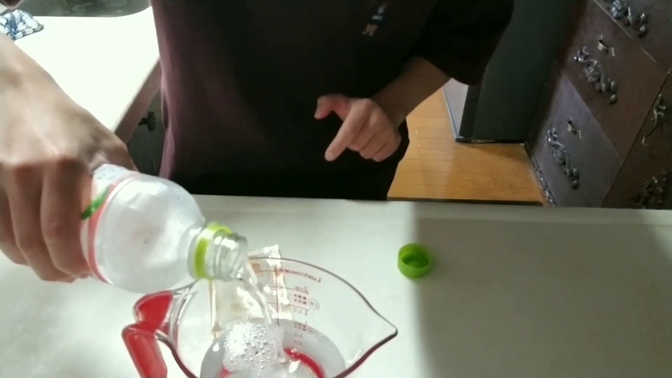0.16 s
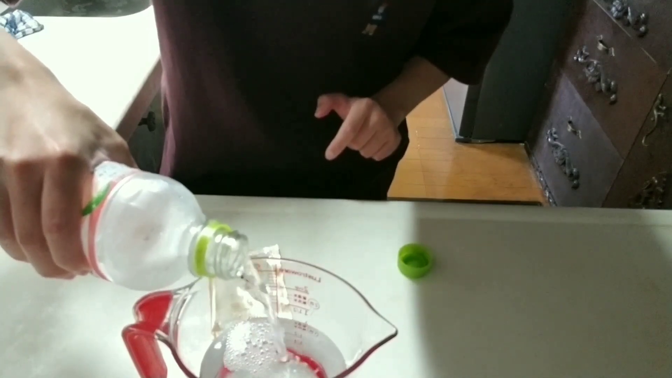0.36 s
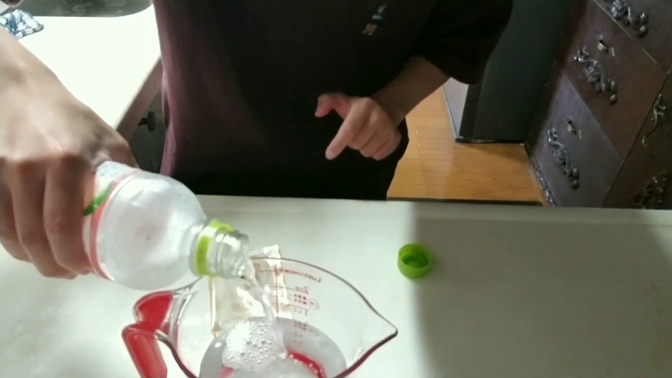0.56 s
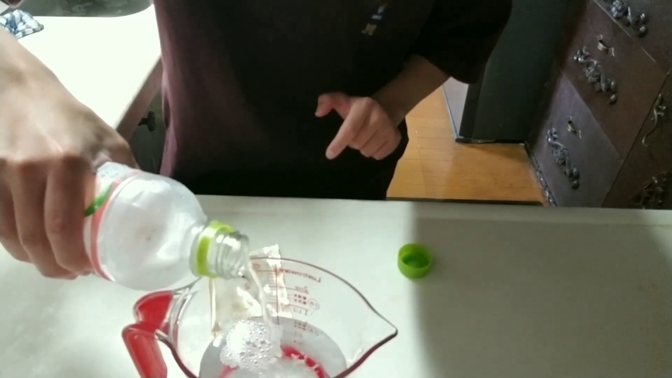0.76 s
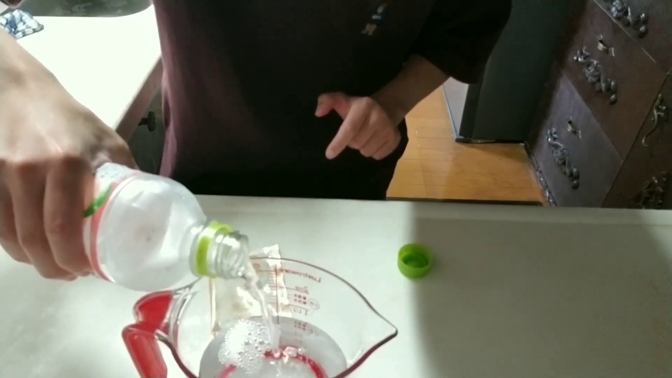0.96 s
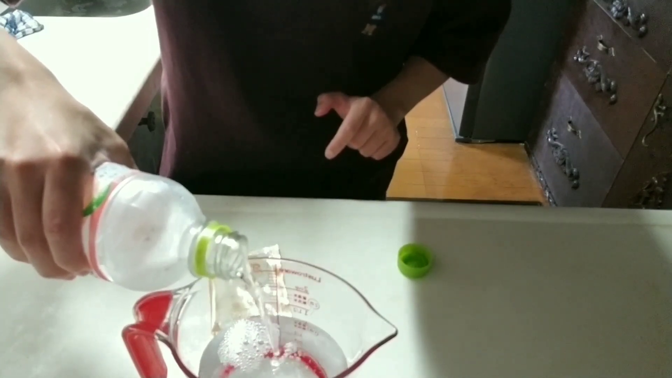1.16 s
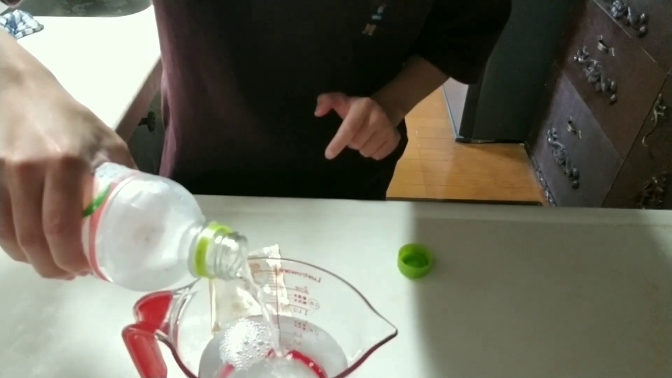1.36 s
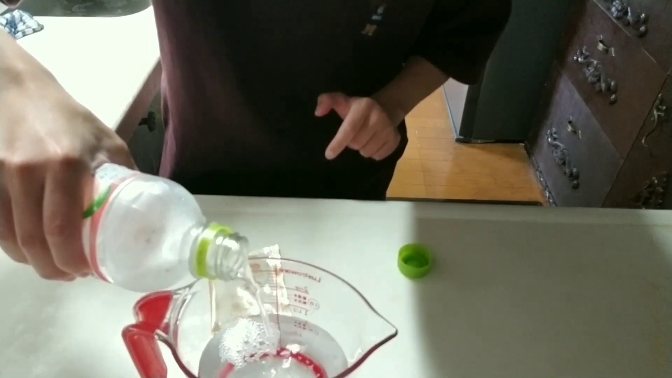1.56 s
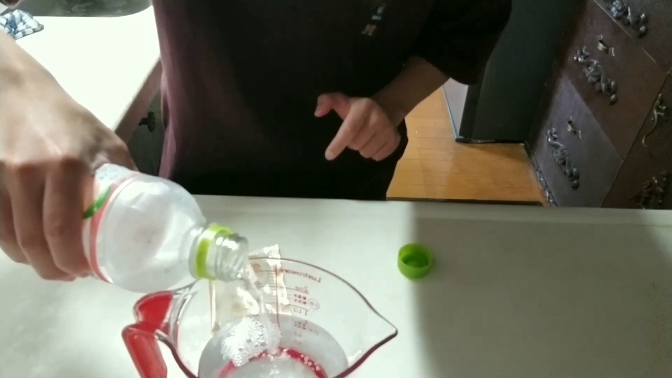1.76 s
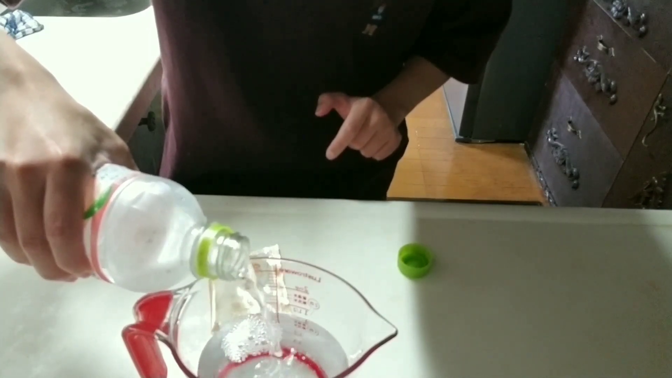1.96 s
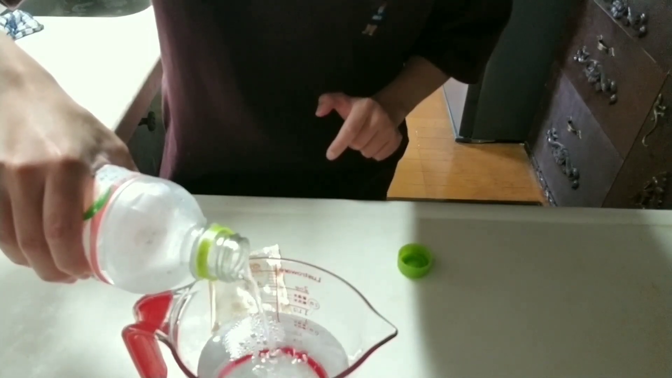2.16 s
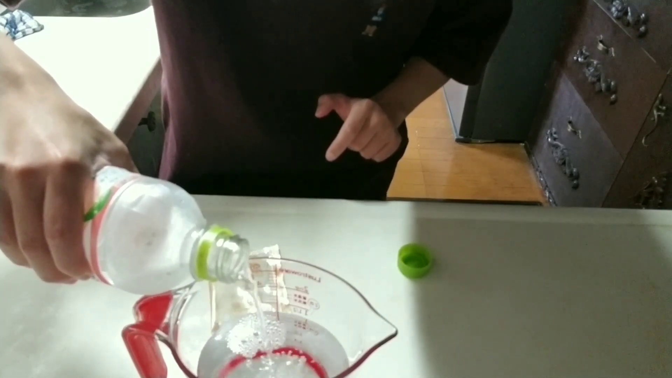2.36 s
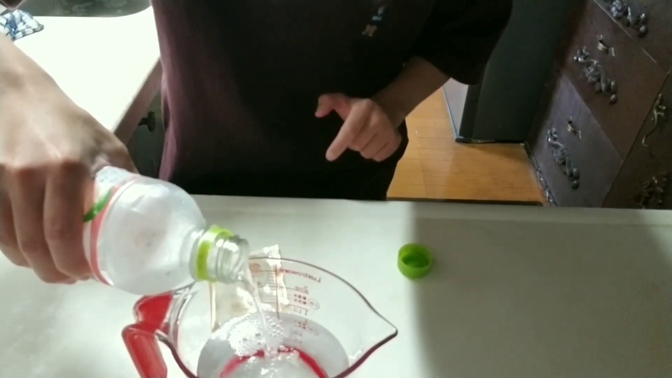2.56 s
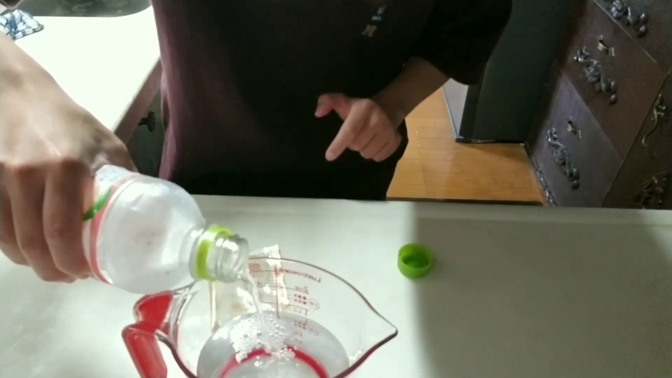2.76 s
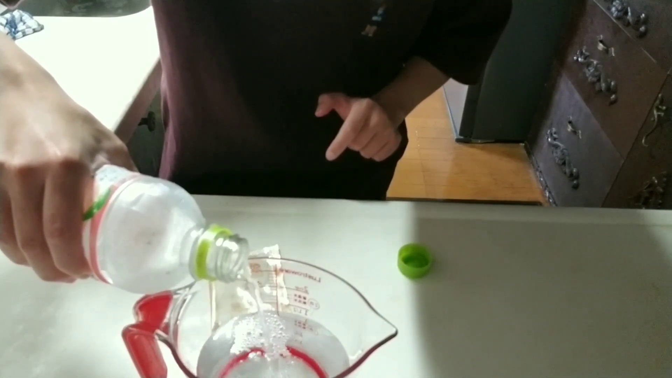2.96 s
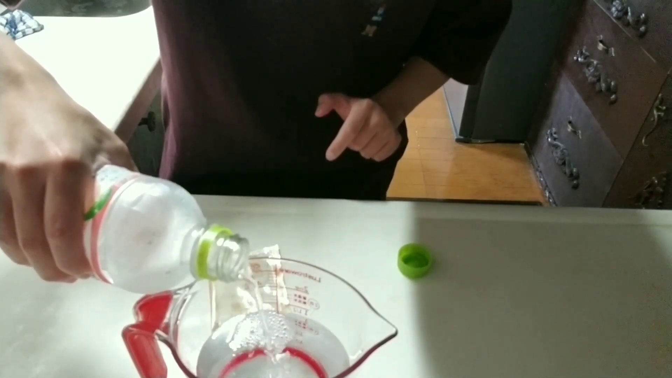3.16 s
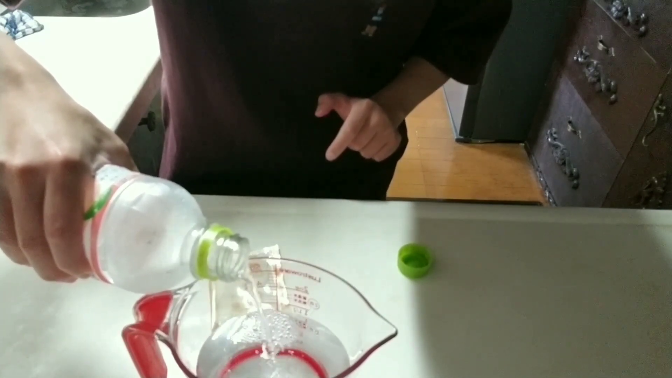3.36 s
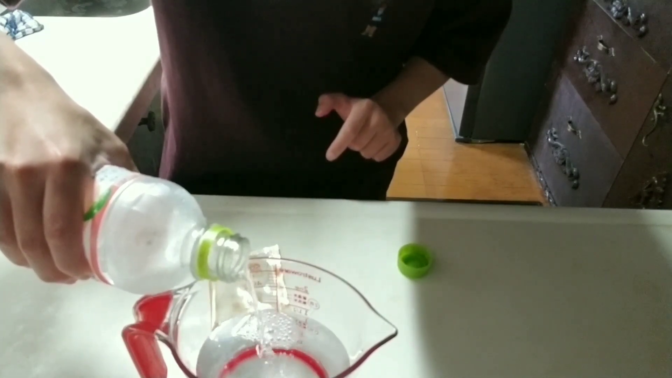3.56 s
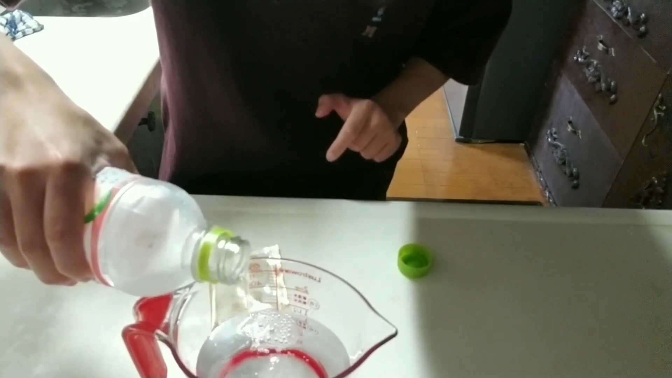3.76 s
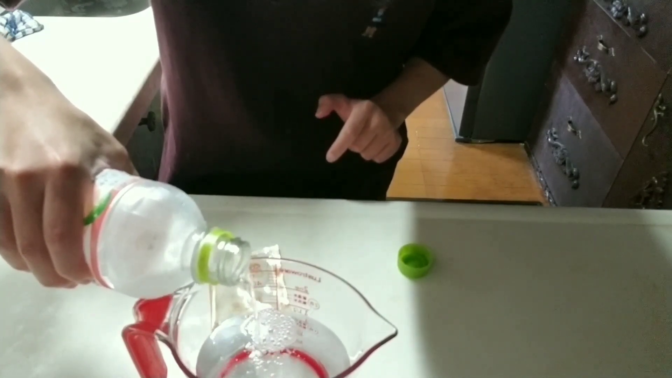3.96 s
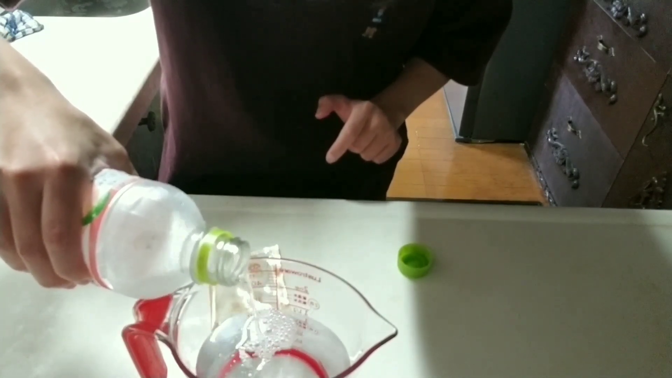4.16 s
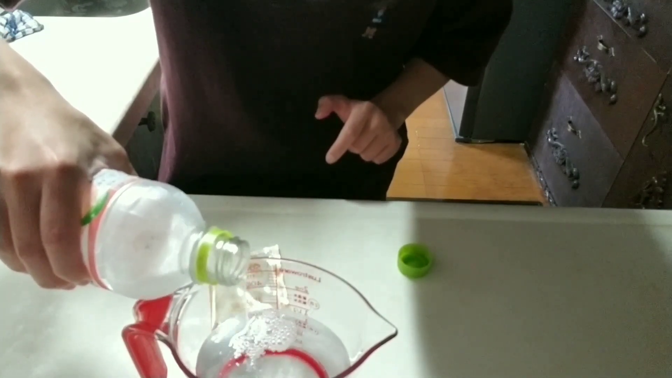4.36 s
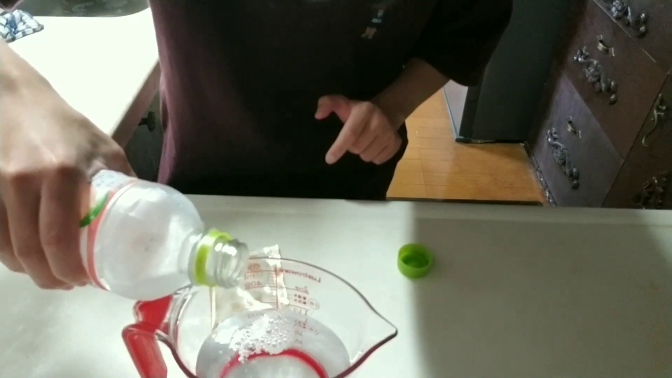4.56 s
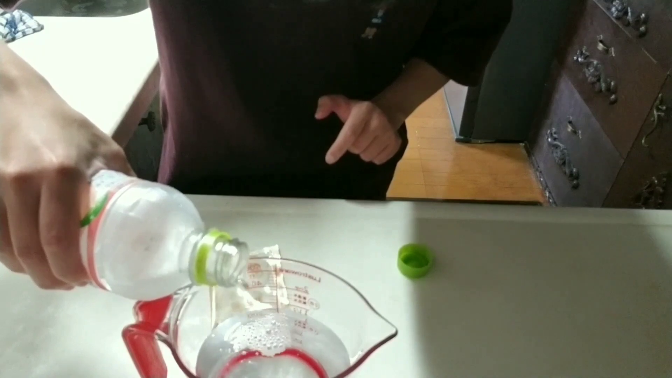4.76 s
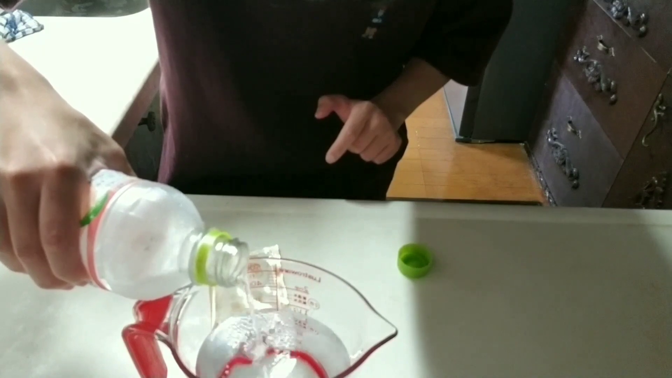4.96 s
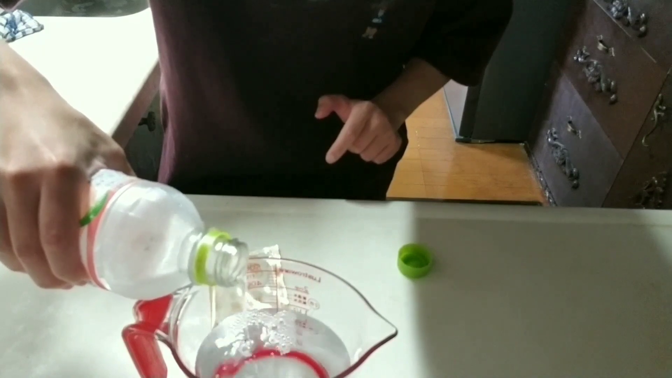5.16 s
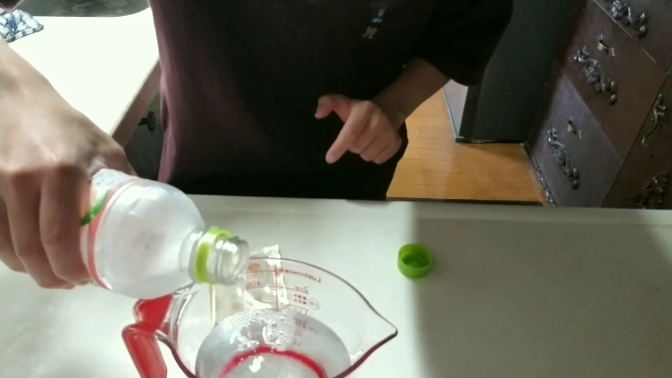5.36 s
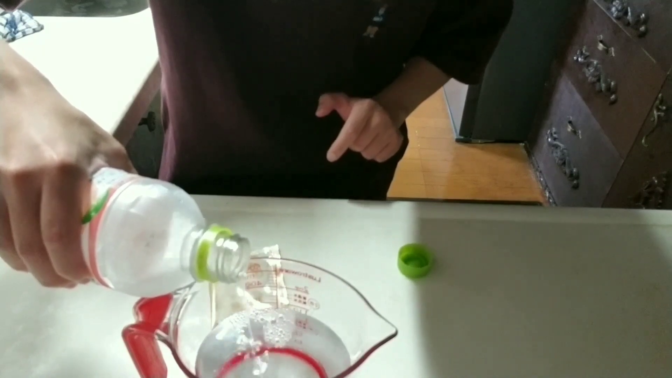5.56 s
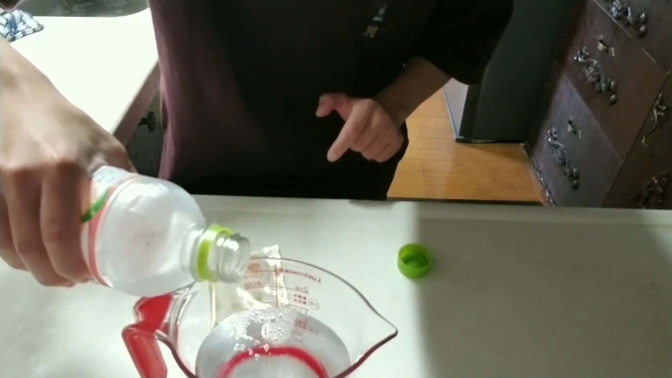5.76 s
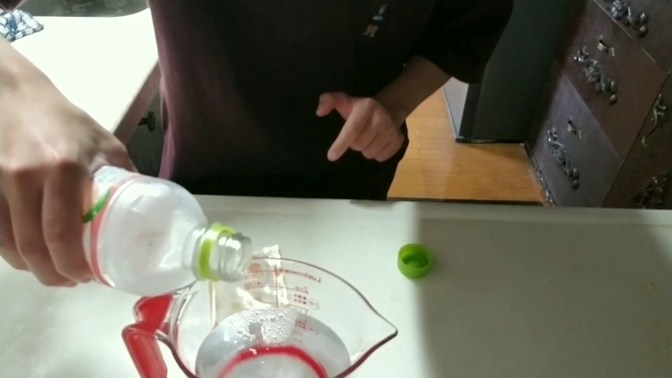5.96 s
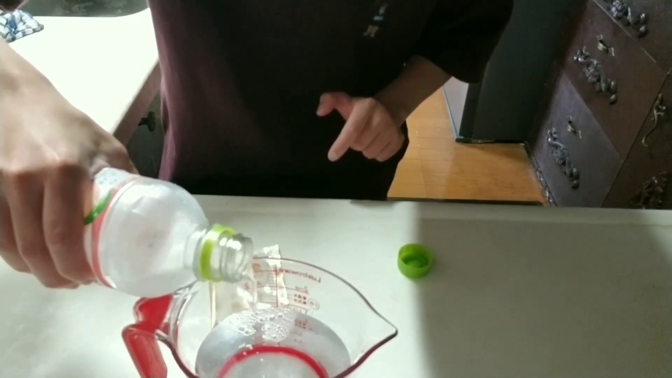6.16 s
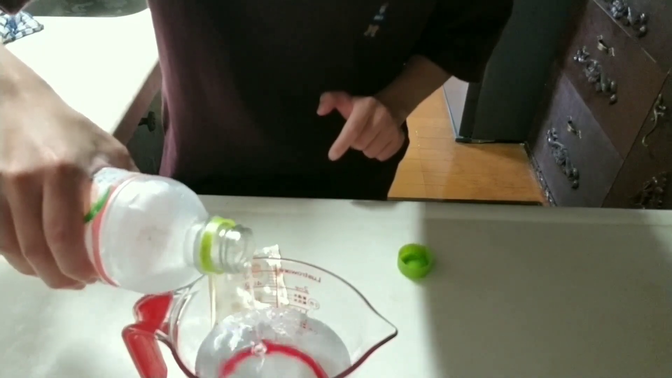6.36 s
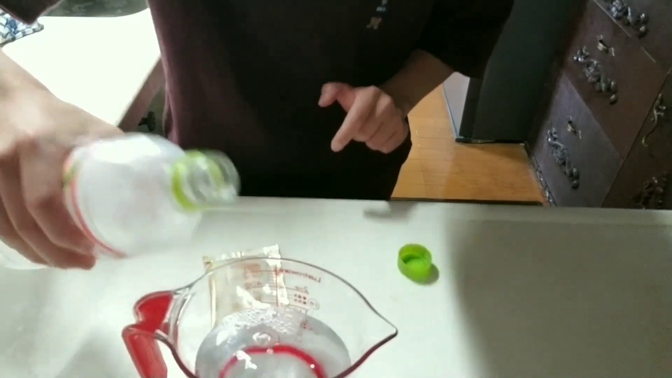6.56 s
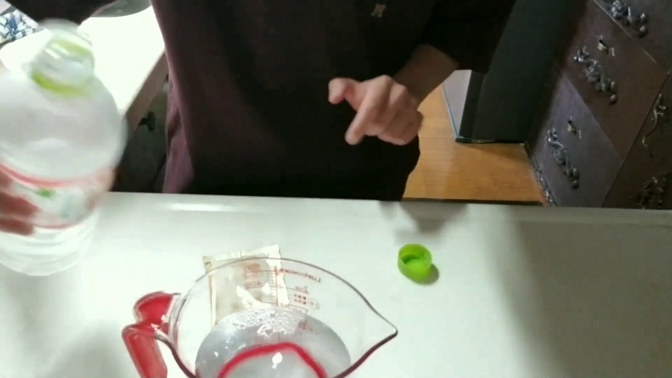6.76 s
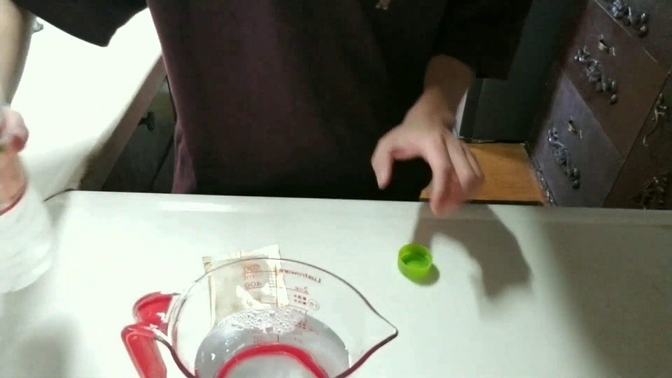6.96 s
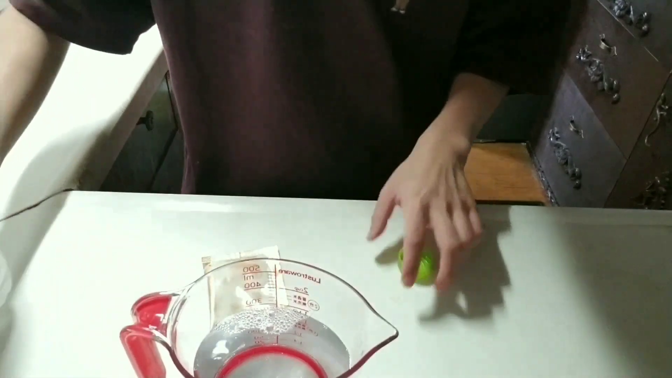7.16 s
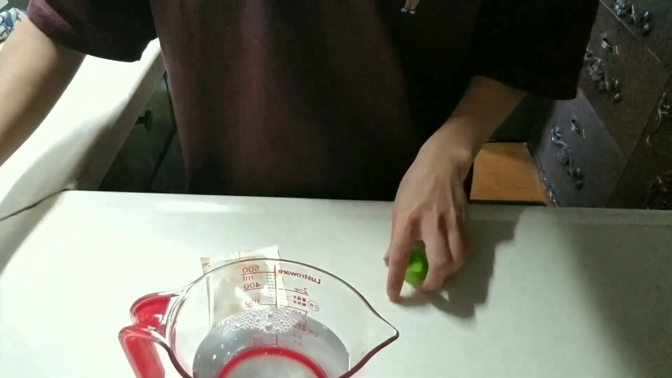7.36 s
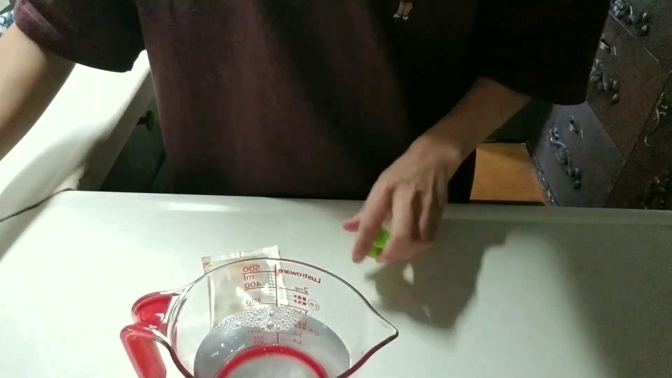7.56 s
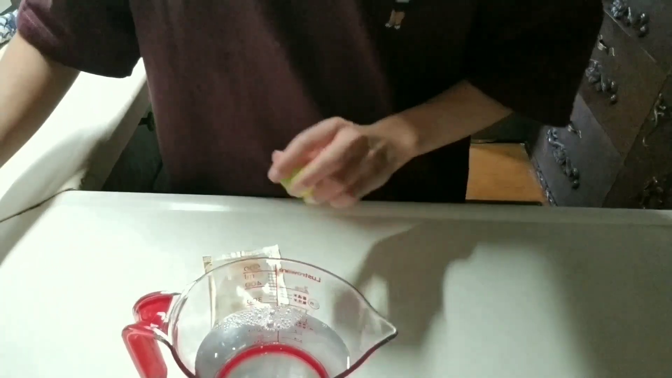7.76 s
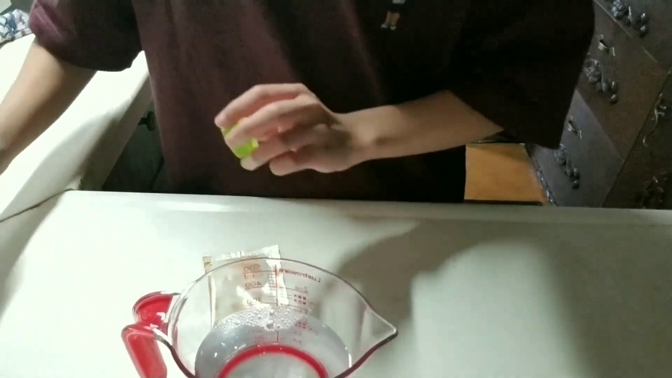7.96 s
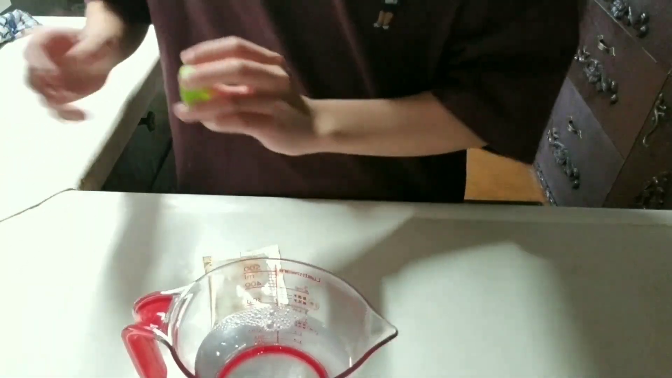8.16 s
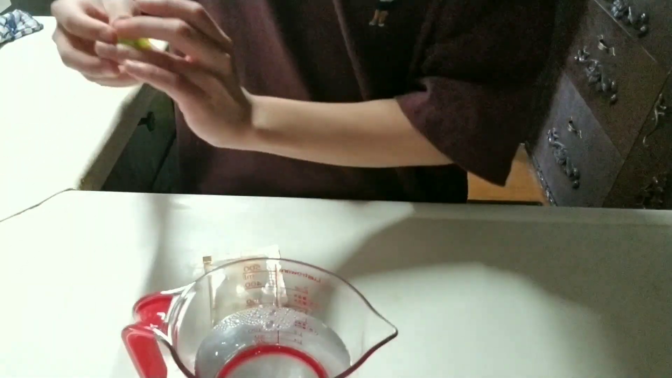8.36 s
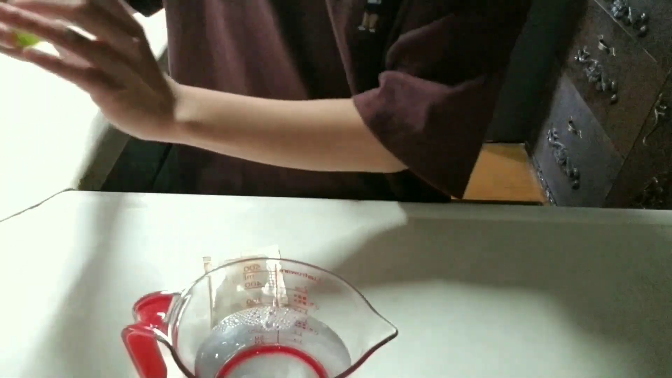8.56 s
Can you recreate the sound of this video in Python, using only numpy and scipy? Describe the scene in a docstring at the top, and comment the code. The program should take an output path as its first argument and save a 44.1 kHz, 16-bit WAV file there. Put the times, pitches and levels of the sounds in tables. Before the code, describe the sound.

Close stereo sound of gentle pouring: small bright bubbles ring with slightly rising pitch among crackling foam and quiet hiss, a little left of centre. Behind it lies steady low room rumble with a wavering thin whine. After nearly seven seconds the trickle ends, thin plastic snaps sharply, the bottle clatters on the counter with dull thuds beneath, and a small plastic cap is picked up with crisp, gritty ticks and scratches.

```python
"""A thin stream of water trickles into a jug: trapped bubbles ring as climbing sines, foam pops and fizzes as noise.
The plastic bottle's thin wall snaps in noise bursts as the grip changes; knocks ring in decaying modes and scuff.
Its cap clicks and drags over the kitchen counter as grainy noise. An appliance hums and whines in wavering tones.
Reflections of noise make the room, and a limiter ducks everything after the loud hits."""
import sys
import numpy as np
from scipy import signal
from scipy.fft import rfft, irfft, next_fast_len
from scipy.io import wavfile

SR = 44100
rng = np.random.default_rng(int(sys.argv[2]) if len(sys.argv) > 2 else 0)


def generate_wav(signal):
    """Clip the signal to [-1, 1] and save it as 16-bit WAV at the path in sys.argv[1]."""
    frames = np.transpose(np.atleast_2d(signal))
    scaled = np.clip(frames, -1, 1) * 32767
    pcm = np.round(scaled).astype(np.int16)
    wavfile.write(sys.argv[1], SR, pcm)


def elevation(decibels):
    """Turn decibel levels (scalar or array-like) into linear amplitude ratios."""
    levels = np.asarray(decibels, float)
    return 10 ** (levels / 20)


N = 380141

# steady room noise: pitch_hz, density_db (relative, per Hz)
ROOM_NOISE = [(15, -11), (25, -8), (114, 1), (166, -9), (256, -4.5), (373, -18), (659, -18), (714, -20.5),
              (1130, -29), (1370, -19.5), (1610, -30), (3000, -32.5), (6740, -31), (8360, -35),
              (12500, -31.5), (16000, -33.5)]
# how alike left and right noise are: pitch_hz, likeness (0 to 1)
LIKENESS = [(60, 0.94), (300, 0.77), (640, 0.31), (1100, 0.053), (3000, 0.011), (15000, .01)]
# appliance tones: pitch_hz, left_db (rms), right_db (rms), left_lead_rad, waver_db
TONES = [(108.2, -49.5, -47, 0.27, -0.5), (213.8, -55.5, -57.5, -1.05, 6.5), (727, -60, -74, -1, 1.5),
         (1334, -57, -92, 0.5, 3.5), (1384, -47, -51.5, 2.5, 1.5)]
# modes of the plastic bottle: pitch_hz, level_db (relative), t60_s
BOTTLE = [(222.6, -14, 0.22), (272, -11.5, 0.043), (304, 5, 0.066), (324, -27, 0.063), (590, -8.5, 0.048),
          (680, -9.5, 0.047), (1020, -14, 0.018), (1403, -9, 0.065), (1636, -1, 0.047), (1965, 2, 0.037),
          (2165, 8.5, 0.037), (2390, -3, 0.058)]
# modes of the counter: pitch_hz, level_db (relative), t60_s
COUNTER = [(48.7, -6, 0.15), (72.2, 2.5, 0.17), (108.5, 1, 0.22), (127, -19, 0.14)]
# knocks; the grip stiffens or slackens the bottle wall: start_s, bottle_db, counter_db, contact_s, pitch_ratio
KNOCKS = [(4.224, -22, -58, 0.004, 0.74), (7.1176, -13.5, -55, 0.00027, 0.99),
          (7.1208, -14, -54, 0.00056, 1.004), (7.152, -24, -51, 0.00054, 1.12),
          (7.2369, -9, -10.5, 0.00073, 1.09), (7.246, 6.5, -47, 0.0025, 0.99),
          (7.256, 1, -43, 0.0024, 0.99), (7.279, -8, -27, 0.0021, 1.055), (7.305, -8, -43, 0.0024, 0.945),
          (7.3438, -21, -14.5, 0.0009, 1.14), (7.35, 0, -29, 0.0024, 0.91),
          (7.3978, -3.5, -2, 0.0026, 1.01), (7.434, -9, -1, 0.0024, 1.024),
          (7.458, -17, -10.5, 0.0009, 0.95), (7.49, -25, -12, 0.00095, 1.16),
          (7.565, -28, -15.5, 0.0013, 0.95), (7.675, -16, -23.5, 0.0011, .98),
          (8.039, -20.5, -38, 0.0046, 0.66)]
# rough scuff after a knock: pitch_hz, density_db (relative, per Hz)
SCUFF_COLOUR = [(250, -2), (600, 5.5), (2400, -11), (6000, -19.5)]
# the cap catches with a click, then drags: start_s, click_db (peak), click_hz (centre), drag_db
SLIPS = [(7.546, -27, 4900, -32.5), (7.5589, -10, 6000, -25), (7.583, -13, 12000, -22),
         (7.5916, -7, 4000, -18), (7.596, -13, 3500, -25), (7.609, -14, 2740, -26.5),
         (7.6122, -13, 3000, -38), (7.655, -12, 5200, -27), (7.661, -12, 4870, -35),
         (7.676, -13, 3970, -32.5), (7.7135, -12, 5460, -23), (7.7305, -4, 11200, -42),
         (7.7435, -7.5, 7650, -34), (7.777, -24, 3350, -27), (7.784, -17, 5000, -29.5),
         (7.7938, -15.5, 3020, -28.5), (7.8056, -6, 10600, -22.5), (7.851, 0, 9600, -27),
         (7.9181, -20.5, 3770, -51)]
# drag of the cap: pitch_hz, density_db (relative, per Hz)
SCRAPE_COLOUR = [(400, 4), (900, -2), (1810, -7), (2630, 9), (6250, 1), (12700, 5), (16000, 3.5)]
# sharp snaps of water and thin plastic: start_s, level_db (peak), centre_hz, t60_s
SNAPS = [(1.5402, -30, 1830, 0.02), (4.8858, -14.5, 11200, 0.0065), (4.9271, -31, 4280, 0.07),
         (5.5344, -33.5, 5500, 0.012), (6.409, -30, 7000, .01), (6.419, -11, 19300, 0.0062),
         (6.5539, -9.5, 8400, 0.0048), (6.556, -18, 7300, 0.046), (6.5674, -29, 7430, 0.0103),
         (6.895, -16.5, 2980, 0.11), (6.8967, -10, 9000, 0.0037), (6.8984, -1.5, 5530, 0.0031),
         (6.8986, -15.5, 1550, 0.0065), (6.8995, -12, 9540, 0.044), (7.1177, -8.5, 2510, 0.033),
         (7.1213, -8.5, 2100, 0.025), (7.2574, -16.5, 4150, 0.067)]
# fizz of the foam, up to the end of the pour: time_s, level_db
TRICKLE = [(0.0, -56), (1.77, -52.5), (1.98, -56.5), (3.92, -75), (4.26, -58.5), (5.99, -87), (6.69, -59),
           (6.9, -51.5)]
# foam bursting into spray: start_s, level_db (peak), mist_t60_s
POPS = [(0.115, -27.5, 0.22), (0.3541, -32, .025), (0.4788, -31, .025), (0.8372, -25.5, 0.13),
        (1.1267, -24, 0.049), (1.2022, -30, 0.021), (1.251, -26.5, .025), (1.54, -20.5, 0.028),
        (1.577, -19.5, 0.044), (1.6273, -19.5, 0.17), (1.716, -22.5, .025), (2.16, -31, .025),
        (2.1789, -29, .025), (2.43, -22, 0.14), (2.7427, -28, .08), (3.247, -34, .025), (3.4274, -34, 0.29),
        (3.4882, -24.5, 0.023), (4.31, -25.5, 0.028), (4.3262, -24, 0.14), (4.4244, -27, 0.23),
        (4.4482, -22, 0.28), (4.9268, -18.5, 0.26), (4.973, -27, 0.031), (5.102, -26, 0.019),
        (5.1824, -32, .025), (5.3207, -29, .025), (6.2238, -31, 0.028), (6.2744, -25.5, 0.06),
        (6.3899, -30, .025), (6.4467, -30, .12), (6.4687, -27, .025), (6.7625, -24, 0.44),
        (6.796, -28, .05)]
# drips whose cavity closes fast, so the pitch shoots up: start_s, level_db, pitch_hz, rise_octaves
DRIPS = [(2.682, -34.5, 2410, 1), (6.362, -40.5, 1820, 5.9)]
# bubbles trapped in the jug: start_s, level_db, pitch_hz
BUBBLES = [(0.1087, -44, 3200), (0.22, -44.5, 2860), (0.7093, -42, 2750), (0.735, -35, 2800),
           (0.786, -40, 3050), (0.858, -32.5, 2760), (0.859, -39, 2140), (0.9144, -43, 2800),
           (1.1277, -36, 4080), (1.1267, -32, 6400), (1.168, -22, 4740), (1.1683, -27, 2830),
           (1.29, -37, 7100), (1.291, -39, 5000), (1.3238, -33, 2780), (1.323, -41.5, 1540),
           (1.3675, -29.5, 2970), (1.44, -45.5, 3130), (1.5402, -31.5, 1775), (1.626, -35.5, 2600),
           (1.6627, -34, 3520), (1.7948, -39.5, 2250), (1.853, -37.5, 3680), (1.948, -32, 2840),
           (2.032, -40.5, 4830), (2.219, -42, 4830), (2.4306, -31.5, 2520), (2.4573, -37, 3540),
           (2.667, -31.5, 1700), (2.685, -34.5, 1710), (2.7435, -30.5, 7300), (2.75, -42, 1470),
           (2.751, -37, 3500), (3.1345, -35, 3350), (3.3024, -41.5, 2350), (3.4268, -41, 4800),
           (3.492, -28.5, 3100), (3.508, -36.5, 1920), (4.134, -34, 7370), (4.341, -32.5, 7450),
           (4.4244, -39, 5040), (4.462, -27.5, 2800), (4.494, -27, 2320), (4.927, -26, 4140),
           (4.933, -18, 1350), (4.95, -30.5, 2480), (4.961, -30, 1180), (4.994, -35.5, 1930),
           (5.039, -35, 1330), (5.048, -26, 1333), (5.061, -28.5, 1375), (5.062, -45, 2530),
           (5.5142, -39, 5500), (5.56, -35.5, 4730), (5.658, -34, 2840), (5.675, -41, 2510),
           (6.2724, -38, 1156), (6.283, -39, 1120), (6.294, -36, 1294), (6.357, -35, 1340),
           (6.429, -29, 4800), (6.433, -35, 2940), (6.4476, -13.5, 3180), (6.4478, -20, 4530),
           (6.764, -33, 5130), (6.7992, -38, 3900), (8.119, -34.5, 1336)]

FLOW_END_S = TRICKLE[-1][0]
JUG_PAN_DB, HAND_PAN_DB = 3, -1   # left over right
HAND_LAG_S = 0.0002   # left behind right
ROOM_NOISE_DB = -40.5
KITCHEN_T60_S, WALL_CUT_HZ = 0.24, 9000
JUG_ROOM_DB, HAND_ROOM_DB = -9, -8.5   # reflections against the direct sound
BOTTLE_SWELL_CYCLES, COUNTER_SWELL_CYCLES = 1.2, 0.71   # time constants of a mode's build-up
SCUFF_DB, SCUFF_DB_PER_DECADE = -25.5, -24   # against a knock of 1 ms contact; less after a softer one
SCUFF_FADE_DB_PER_S = 222
DRAG_HOLD_S, DRAG_FADE_DB_PER_S = 0.0076, 800
CLICK_T60_S, SNAP_ATTACK_S = 0.0053, 0.00008
TICK_T60_S, MIST_DB = 0.0031, -7   # spray opens with a tick; the mist after it starts weaker
POPS_PER_S, FIZZ_SWELL_DB = 23, 1.8
FAINT_PER_S, FAINT_LOW_HZ, FAINT_HIGH_HZ = 40, 1900, 7000
RING_CYCLES, SMALL_RING_CYCLES = 87, 72   # start-pitch cycles in which a large or small bubble falls 60 dB
RISE_OCTAVES = 0.12   # climb of a bubble's pitch while it rings
SMALL_HZ = 2000   # bubbles from here up are small and bring company
SWARM_DB, SWARM_S, SWARM_OCTAVES = -14, 0.035, 0.9   # neighbours: top level against the bubble, spreads
SPRAY_DB, CHURN_DB = -9, -12   # against the bubble
CHURN_EDGE_RATIO, CHURN_T60_S = 1.11, 0.093
LIMIT_DB, RELEASE_DB_PER_S, ATTACK_S = -2, 42, 0.0062


def rms_one(x):
    """Scales a sound to rms 1."""
    return x / np.sqrt(np.mean(x ** 2) + 1e-20)


def peak_one(x):
    """Scales each channel to peak 1."""
    return x / abs(x).max(axis=-1, keepdims=True)


def at_hz(points, hz):
    """Reads a curve along a logarithmic pitch axis."""
    pitches, values = np.array(points).T
    return np.interp(np.log(hz + 1), np.log(pitches), values)


def drift(rate):
    """Random wander: straight lines between about 2 * rate unit-spread points a second."""
    steps = int(N / SR * rate * 2) + 2
    return np.interp(np.arange(N), np.linspace(0, N, steps), rng.standard_normal(steps))


def coloured(spectrum, likeness):
    """Stereo noise of a given spectrum and left-right likeness; mid rms 1."""
    size = next_fast_len(N)
    hz = np.arange(size // 2 + 1) * SR / size
    mid, side = rfft(rng.standard_normal((2, size))) * elevation(at_hz(spectrum, hz))
    alike = np.clip(at_hz(likeness, hz), 0, 1)
    pair = irfft(np.sqrt(1 + alike) * mid + np.sqrt(1 - alike) * side * [[1], [-1]], size)[:, :N]
    return pair / np.std(pair.mean(axis=0))


def sides_db(pan_db):
    """Splits a pan into a left and a right level."""
    return pan_db / 2 * np.array([[1], [-1]])


def add(out, s, sound, pan_db, lag_s=0):
    """Places a short mono sound in both channels, the left one lagging."""
    for side, late, db in zip(out, (lag_s, 0), (pan_db / 2, -pan_db / 2)):
        at = round((s + late) * SR)
        side[at:at + len(sound)] += (elevation(db) * sound)[:N - at]


def add_pair(out, s, pair, level_db, pan_db):
    """Places a short stereo sound."""
    at = round(s * SR)
    out[:, at:at + np.shape(pair)[1]] += elevation(level_db + sides_db(pan_db)) * pair


def appliance():
    """Rumble and hiss of coloured noise, with a few sines that waver in level and phase."""
    swell_db = 0.9 * drift(3)
    out = elevation(ROOM_NOISE_DB + swell_db + sides_db(1.2)) * coloured(ROOM_NOISE, LIKENESS)
    t = np.arange(N) / SR
    for hz, left_db, right_db, lead, waver_db in TONES:
        phase = 2 * np.pi * (hz * t + rng.random()) + 0.35 * drift(2.8)
        pair = np.array([elevation(left_db) * np.sin(phase + lead), elevation(right_db) * np.sin(phase)])
        out += np.sqrt(2) * elevation(waver_db * drift(6)) * pair   # rms to peak
    return out


def kitchen(x):
    """Dense reflections, own ones in each channel, dying away and dulled by the walls; weak in the bass."""
    t = np.arange(int(0.5 * SR)) / SR
    echoes = rng.standard_normal((2, len(t))) * elevation(-60 * t / KITCHEN_T60_S) * (t > 0.003)
    echoes = signal.lfilter(*signal.butter(1, [450, WALL_CUT_HZ], "band", fs=SR), echoes)
    echoes /= np.sqrt(np.sum(echoes ** 2, axis=1, keepdims=True))
    return signal.fftconvolve(x, echoes, axes=1)[:, :N]


def ringing(modes, pitch_ratio, swell_cycles):
    """The modes of one struck body: decaying sines, each swelling over its first cycles."""
    t = np.arange(int(0.5 * SR)) / SR
    out = np.zeros(len(t))
    for hz, db, t60 in modes:
        swell = 1 - np.exp(-t * hz / swell_cycles)
        out += elevation(db - 60 * t / t60) * swell * np.sin(2 * np.pi * hz * pitch_ratio * t)
    return out


def knocks():
    """A smooth raised-cosine push, set by the contact time, rings the bottle's modes and the counter's."""
    out = np.zeros((2, N))
    counter = ringing(COUNTER, 0.94, COUNTER_SWELL_CYCLES)
    for s, bottle_db, counter_db, contact_s, pitch_ratio in KNOCKS:
        push = np.hanning(int(contact_s * SR) + 3)
        bottle = ringing(BOTTLE, pitch_ratio, BOTTLE_SWELL_CYCLES)
        ring = elevation(bottle_db) * bottle + elevation(counter_db) * counter
        add(out, s, -signal.fftconvolve(ring, push / push.sum()), pan_db=1.0, lag_s=HAND_LAG_S)
    return signal.lfilter(*signal.butter(2, 42, "high", fs=SR), out)   # the knocks carry no deep bass


def rubbing(strokes, hold_s, fade_db_per_s, colour):
    """Dense noise grains under strokes of (start_s, level_db) that start at once, hold and fade; powers add."""
    power = np.zeros(N + SR)
    t = np.arange(SR // 2) / SR
    shape = elevation(-fade_db_per_s * np.maximum(t - hold_s, 0)) ** 2
    for s, db in strokes:
        power[round(s * SR):][:len(t)] += elevation(db) ** 2 * shape
    grains = rms_one(elevation(1.5 * drift(150) + 4.2 * drift(1800)))
    return np.sqrt(power[:N]) * elevation(sides_db(HAND_PAN_DB)) * grains * coloured(colour, LIKENESS)


def knock_scuffs():
    """A short rough scuff of grainy noise follows each knock, weaker after a long, soft contact."""
    strokes = []
    for s, bottle_db, counter_db, contact_s, _ in KNOCKS:
        softness_db = SCUFF_DB_PER_DECADE * np.log10(1000 * contact_s)
        strokes.append((s, max(bottle_db, counter_db) + SCUFF_DB + softness_db))
    return rubbing(strokes, 0, SCUFF_FADE_DB_PER_S, SCUFF_COLOUR)


def cap_drags():
    """The cap rubs along the counter after each catch."""
    strokes = [(s, drag_db) for s, _, _, drag_db in SLIPS]
    return rubbing(strokes, DRAG_HOLD_S, DRAG_FADE_DB_PER_S, SCRAPE_COLOUR)


def snaps_and_clicks():
    """Each snap or cap click is a decaying noise burst in a broad band, partly unlike left and right."""
    out = np.zeros((2, N))
    t = np.arange(1500) / SR
    for s, db, hz, t60 in SNAPS + [(s, db, hz, CLICK_T60_S) for s, db, hz, _ in SLIPS]:
        shared, *own = rng.standard_normal((3, len(t)))
        fade = elevation(-60 * t / t60) * (1 - np.exp(-t / SNAP_ATTACK_S))
        band = signal.butter(2, [hz / 1.72, min(hz * 1.46, 19000)], "band", fs=SR)
        pair = signal.lfilter(*band, (0.5 * shared + np.array(own)) * fade)
        # over the jug until the bottle swings away
        over_jug = s < FLOW_END_S - 0.05
        pan_db, lag_s = (JUG_PAN_DB, 0) if over_jug else (HAND_PAN_DB, HAND_LAG_S)
        pair[0] = np.roll(pair[0], round(lag_s * SR))
        add_pair(out, s, peak_one(pair), db, pan_db)
    return out


def spray(noise, t60):
    """A tick and a gritty treble mist of cubed noise, peak 1."""
    burst = signal.lfilter(*signal.butter(2, 5000, "high", fs=SR), noise ** 3)
    t = np.arange(noise.shape[-1]) / SR
    return peak_one(burst * (elevation(-60 * t / TICK_T60_S) + elevation(MIST_DB - 60 * t / t60)))


def fizz():
    """Foam hisses as coloured noise that swells slowly and flickers fast while the stream runs."""
    t = np.arange(N) / SR
    level_db = np.interp(t, *np.transpose(TRICKLE)) + FIZZ_SWELL_DB * drift(4.8) + 4.4 * drift(300)
    hiss = coloured([(1500, -38), (4000, -1.0), (12000, -0.5), (16000, 6.0)], LIKENESS)
    return (t < FLOW_END_S) * elevation(level_db) * hiss


def foam_pops():
    """Foam bursts into spray: the listed pops, and small random ones in clusters while the stream runs."""
    out = np.zeros((2, N))
    for s, db, t60 in POPS:
        add_pair(out, s, spray(rng.standard_normal((2, 4000)), t60), db, JUG_PAN_DB)
    chance = POPS_PER_S * elevation(4 * drift(4)) / SR
    flowing = np.arange(N) < FLOW_END_S * SR
    for at in np.flatnonzero((rng.random(N) < chance) & flowing):
        size, side = rng.random(2)
        pop = elevation(-42.5 - 3.7 * np.log(size + 0.02)) * spray(rng.standard_normal(200), 0.0053)
        add(out, at / SR, pop, JUG_PAN_DB + 8 * (side - 0.5))
    return out


def churn(noise, hz):
    """Rough water around a small bubble's pitch: a lumpy narrow-band noise burst, peak 1."""
    t = np.arange(noise.shape[-1]) / SR
    band = signal.butter(2, [hz / CHURN_EDGE_RATIO, hz * CHURN_EDGE_RATIO], "band", fs=SR)
    lumps = signal.lfilter(*band, noise * abs(noise))
    return peak_one(lumps * elevation(-60 * t / CHURN_T60_S) * (1 - np.exp(-t / 0.0065)))


def bubble(hz, rise, cycles=RING_CYCLES):
    """A decaying sine whose pitch climbs as the bubble nears the surface."""
    t60 = cycles / hz
    t = np.arange(int(t60 * SR)) / SR
    pitch = np.minimum(hz * 2 ** (rise * (t / t60 - 0.1)), 16000)
    phase = 2 * np.pi * np.cumsum(pitch) / SR
    return np.sin(phase) * elevation(-60 * t / t60) * (1 - np.exp(-t * hz * 0.83))


def faint_bubbles():
    """Faint bubbles ring at random while the stream runs."""
    out = np.zeros((2, N))
    for when, size, pitch in rng.random((int(FAINT_PER_S * FLOW_END_S), 3)):
        hz = FAINT_LOW_HZ * (FAINT_HIGH_HZ / FAINT_LOW_HZ) ** pitch
        add(out, when * FLOW_END_S, elevation(-50 + 7.6 * size) * bubble(hz, 0.3, cycles=28), JUG_PAN_DB)
    return out


def bubbles_and_drips():
    """Large bubbles and drips ring alone; a small bubble brings a splash, weaker neighbours, spray and churn."""
    out = np.zeros((2, N))
    for s, db, hz, rise in DRIPS:
        add(out, s, elevation(db) * bubble(hz, rise), JUG_PAN_DB)
    for s, db, hz in BUBBLES:
        small = hz >= SMALL_HZ
        cycles = SMALL_RING_CYCLES if small else RING_CYCLES
        add(out, s, elevation(db) * bubble(hz, RISE_OCTAVES, cycles), JUG_PAN_DB)
        if not small:
            continue
        add(out, s, elevation(db - 2) * bubble(hz * 0.79, 0.1, cycles=5.2), JUG_PAN_DB)   # the splash that traps it
        for late, pitch, size in rng.random((3, 3)):
            near_hz = hz * 2 ** (SWARM_OCTAVES * (pitch - 0.4))
            neighbour = elevation(db + SWARM_DB - 8.7 * size) * bubble(near_hz, 0.17, cycles=40)
            add(out, s + SWARM_S * late, neighbour, JUG_PAN_DB)
        noise = rng.standard_normal((2, 4000))
        add_pair(out, s, spray(noise, 0.17), db + SPRAY_DB, JUG_PAN_DB)
        add_pair(out, s, churn(noise, hz), db + CHURN_DB, JUG_PAN_DB)
    return out


def water():
    """The stream in the jug: ringing bubbles over popping, fizzing foam."""
    return fizz() + foam_pops() + faint_bubbles() + bubbles_and_drips()


def scene():
    """Water and handling, direct and reflected by the kitchen, over the appliance."""
    hands = knocks() + knock_scuffs() + cap_drags() + snaps_and_clicks()
    jug = water()
    reflected = kitchen(elevation(JUG_ROOM_DB) * jug + elevation(HAND_ROOM_DB) * hands)
    return appliance() + reflected + hands + jug


def band_limit(x):
    """A steep low-pass at the top of the band."""
    return signal.sosfilt(signal.butter(12, 15500, fs=SR, output="sos"), x)


def record(dry):
    """A limiter on both channels together, quick to duck and slow to let go; peaks that slip past clip."""
    slope = RELEASE_DB_PER_S * np.arange(N) / SR
    over_db = np.maximum(20 * np.log10(abs(dry).max(axis=0) + 1e-9) - LIMIT_DB, 0)
    held_db = np.maximum.accumulate(over_db + slope) - slope   # jumps up, then falls at the release rate
    pole = np.exp(-1 / (ATTACK_S * SR))
    duck_db = signal.lfilter([1 - pole], [1, -pole], held_db)
    mix = 0.97 * np.clip(dry * elevation(-duck_db), -1, 1)
    return band_limit(mix)


dry = scene()
out = record(dry)
generate_wav(out)
```